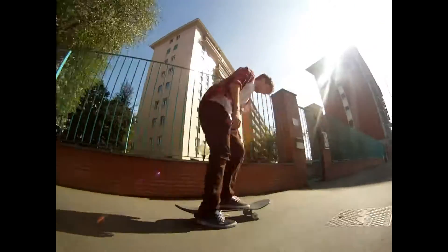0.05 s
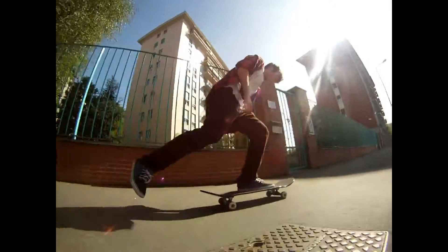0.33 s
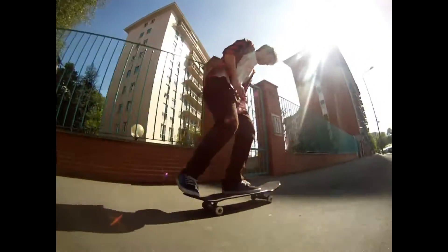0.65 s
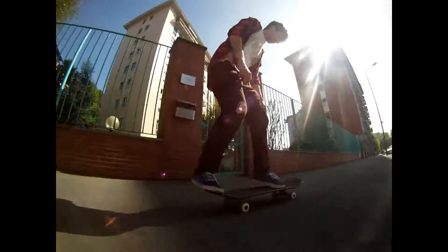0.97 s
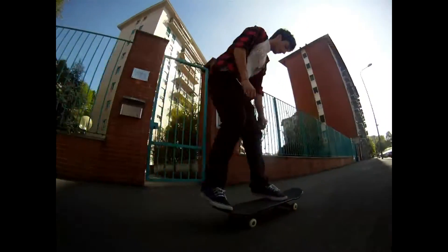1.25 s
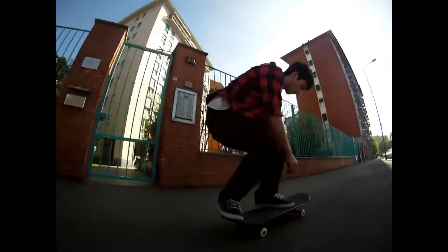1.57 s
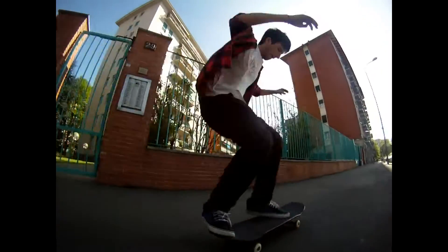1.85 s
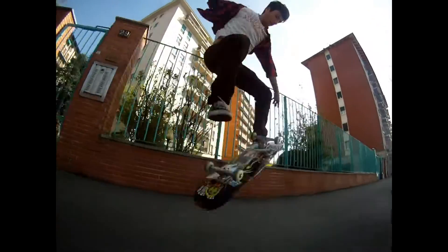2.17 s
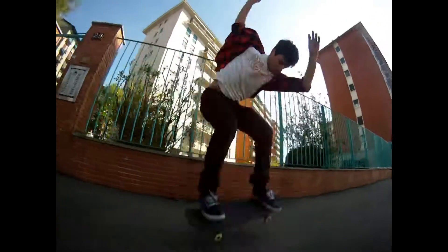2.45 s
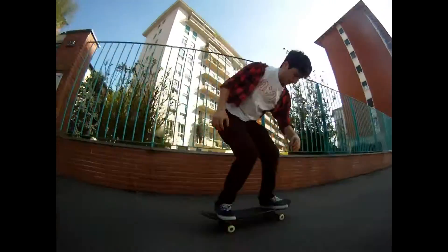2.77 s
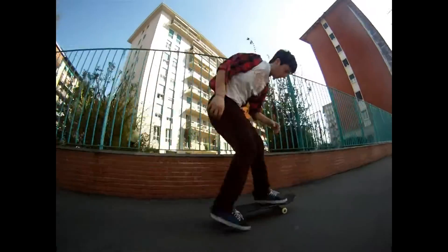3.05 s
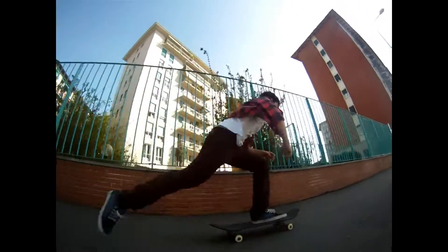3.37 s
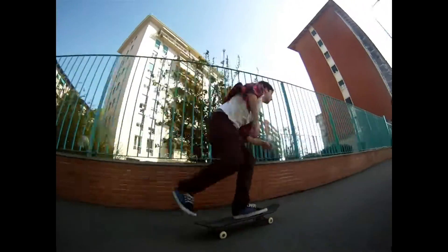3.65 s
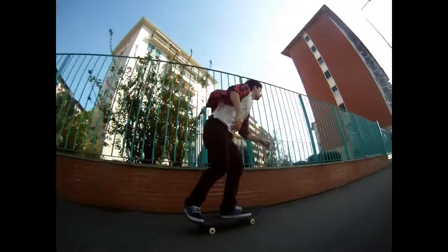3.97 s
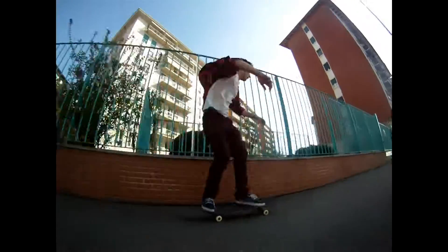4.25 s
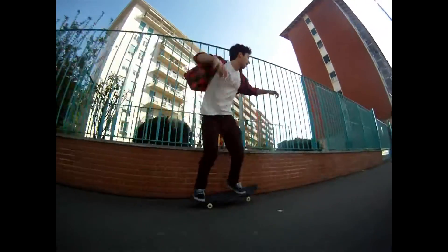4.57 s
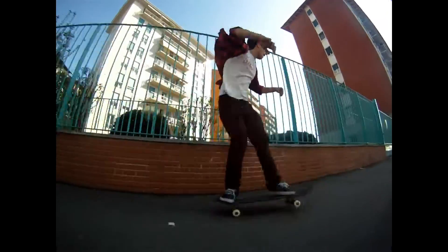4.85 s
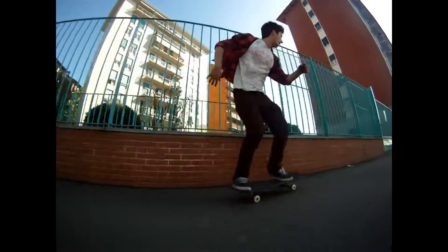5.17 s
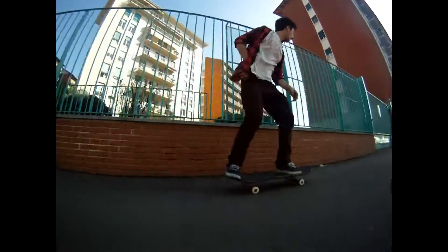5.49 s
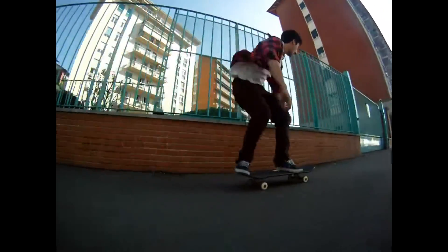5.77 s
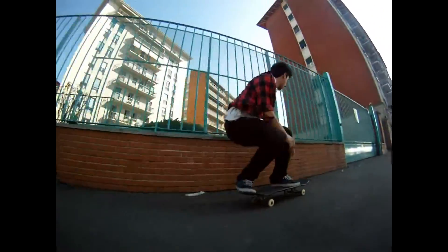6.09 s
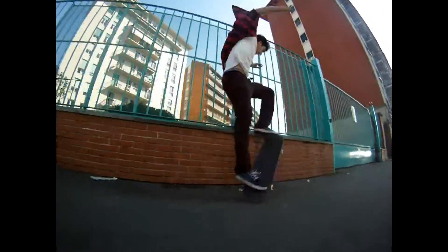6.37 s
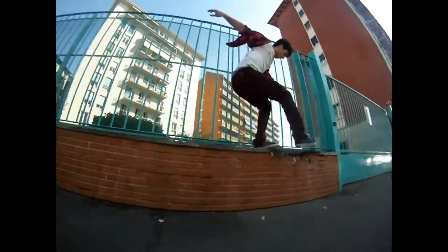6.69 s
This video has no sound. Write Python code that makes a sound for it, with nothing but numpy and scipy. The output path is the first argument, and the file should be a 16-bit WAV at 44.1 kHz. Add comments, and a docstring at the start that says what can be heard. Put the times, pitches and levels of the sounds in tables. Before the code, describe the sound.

A hard knock and a low shudder open on the gritty roar and hiss of skateboard wheels on asphalt. Shoes scuff between small clicks, then the board pops sharply and lands with a loud, slightly overloaded clatter. Rolling continues with more scuffs and a growing rumble, ending in clacks and scrapes on a ledge. The microphone rides along close by, and the street returns a faint, short echo.

```python
"""A knock and a low shudder open on the roar and hiss of skateboard wheels rolling over asphalt.
The skater pops a flip trick, lands hard, pushes on and jumps onto a ledge: shoes and wheels scuff,
deck and trucks clack, and house fronts echo the clacks. A small camera in a plastic case rides along.
It shudders with the ground, faster as the speed grows; the resonances of its case colour the rolling,
scuffs and clacks, and the hardest blows overload its microphone."""
import sys
import numpy as np
from scipy import signal
from scipy.fft import rfft, irfft
from scipy.io import wavfile

SR = 44100
rng = np.random.default_rng(int(sys.argv[2]) if len(sys.argv) > 2 else 0)


def store_pcm(level_fs):
    """Save levels as 16-bit WAV."""
    pcm = np.round(np.clip(level_fs, -1, 1) * 32767).astype(np.int16)
    wavfile.write(sys.argv[1], SR, np.atleast_2d(pcm).T)


N = 301203

# speed of the ride, as the rate at which it shakes the camera: t/s, f/Hz
SHAKE_RATE = [(0, 56.15), (.17, 53.04), (.3, 32.68), (.85, 38.14), (1.2, 33.86), (1.8, 42.15),
              (2.15, 37.02), (2.75, 44.87), (3.4, 57.35), (3.9, 62.86), (4.12, 56), (4.6, 64.8),
              (5.1, 62.1), (5.6, 68.45), (6.0, 62.8), (6.25, 55.1), (6.55, 65.8), (6.83, 65.3)]
# spectrum of a hard contact with the board: f/Hz, level/dB
IMPACT_SPECTRUM = [(60, -2), (200, -6.5), (400, -7), (700, -8.5), (1600, -5.5), (2600, -0.5), (4400, -18),
                   (7600, -27), (12000, -32), (15200, -22.5), (16000, -7.5)]


def amp(db):
    """Amplitude ratio of a level in decibels."""
    return 10 ** (np.asarray(db) / 20)


def unit_rms(x):
    """Normalisation to unit mean power."""
    return x / np.sqrt(np.mean(x ** 2) + 1e-20)


def at_frequency(points, hz):
    """Linear interpolation on a log-frequency axis."""
    f, value = np.transpose(points)
    return np.interp(np.log(hz + 1), np.log(f + 1), value)


def over_time(points):
    """Linear interpolation in time, sample by sample."""
    times, values = np.transpose(points)
    return np.interp(np.arange(N) / SR, times, values)


def add(mix, start, sound):
    """Superposition of a sound on the mix from a start time in seconds."""
    part = mix[max(round(start * SR), 0):][:len(sound)]
    part += sound[:len(part)]


def wander(hz):
    """Low-pass noise: a random fluctuation of unit power, up to about hz."""
    f = np.fft.rfftfreq(N, 1 / SR)
    return unit_rms(irfft(rfft(rng.standard_normal(N)) * np.exp(-(f / hz) ** 2), N))


def noise(spectrum):
    """Stationary noise of unit power with the given spectrum."""
    gain = amp(at_frequency(spectrum, np.fft.rfftfreq(N, 1 / SR)))
    return unit_rms(irfft(rfft(rng.standard_normal(N)) * gain, N))


def colour(x, gain_db, size=4096):
    """Minimum-phase filtering by gain_db(hz): resonances ring on after each click."""
    log_gain = np.log(amp(gain_db(abs(np.fft.fftfreq(size, 1 / SR)))))
    response = np.exp(np.conj(signal.hilbert(log_gain)))
    taps = np.fft.ifft(response).real
    return signal.fftconvolve(x, taps[:size // 2])[:len(x)]


def resonate(x, hz, width_hz):
    """A moving resonance by heterodyning: shift the curve hz down to zero, smooth, shift back."""
    phasor = np.exp(2j * np.pi * np.cumsum(hz) / SR)
    pole = np.exp(-np.pi * width_hz / SR)
    return 2 * (phasor * signal.lfilter([1 - pole], [1, -pole], x / phasor)).real


def ring(modes, t):
    """Free vibration after a blow: a sum of exponentially damped modes."""
    return sum(amp(db - 60 * t / t60) * np.sin(2 * np.pi * hz * t) for hz, db, t60 in modes)


def grit(per_s, spread_db):
    """Shot noise: stones of uneven size are struck at random times."""
    strikes = (rng.random(N) < per_s / SR) * rng.standard_normal(N)
    sizes = amp(spread_db * np.minimum(rng.exponential(1, N), 4))
    return unit_rms(strikes * sizes)


def speed_gain_db(per_doubling_db, cruise_hz=60):
    """A power law of speed: 0 dB when cruising, and an equal step for each doubling."""
    return per_doubling_db * np.log2(over_time(SHAKE_RATE) / cruise_hz)


def case_db(hz):
    """Resonances of the camera case, with one narrow notch; apart from these, the top treble is cut."""
    # case resonances and notch, then the treble cut in the last row: f/Hz, half width/Hz, gain/dB
    bands = [(544, 44, 2.5), (838, 82, 4.5), (998, 112, 7), (1420, 197, 5), (2029, 73, 8),
             (2283, 173, 11.5), (2960, 240, 5), (3172, 118, 8.5), (3475, 66, 7), (3833, 320, 8),
             (5140, 350, 12.5), (5700, 110, 7), (6130, 120, 4.5), (6860, 490, 14.5), (8150, 380, 15.5),
             (8904, 440, 13.5), (9734, 716, 21.5), (10830, 280, 15), (8730, 72, 10), (9760, 33, 11.5),
             (14200, 940, 16.5), (14260, 70, -14), (17700, 530, -28)]
    return sum(db * np.exp(-((hz - f) / width) ** 2) for f, width, db in bands)


def street_echo(x, delay_s=0.026, reflections_per_s=2000):
    """Scattering: walls and house fronts return a short, diffuse echo."""
    # reverberation time of the street: f/Hz, T60/s
    decay_times = [(100, 0.22), (1000, 0.37), (2500, 0.14), (8000, 0.22), (16000, 0.12)]
    reflections = rng.standard_normal(SR) * (rng.random(SR) < reflections_per_s / SR)
    reflections *= np.arange(SR) / SR > delay_s
    hz, t, spectra = signal.stft(reflections, SR, nperseg=256)
    decay = amp(-60 * t / at_frequency(decay_times, hz)[:, None])
    tail = signal.istft(spectra * decay, SR)[1]
    return signal.fftconvolve(x, tail / np.linalg.norm(tail))[:N]


def whine(rumble, hz=12000, gain_db=-42):
    """Amplitude modulation: a thin high whine flutters with every swing of the rumble."""
    carrier = np.sin(2 * np.pi * hz * np.arange(N) / SR)
    return amp(gain_db) * rumble * carrier


def shudder(cruise_db=-22.5, drift=0.039, throb=0.67, surge_taper=0.45, sway_db=-27, thrum_db=-27):
    """Forced vibration: the ground shakes the camera, faster and harder with speed, and jolts rock it."""
    # surges of hard, even shaking: start t/s, end t/s, level/dB
    surges = [(1.087, 1.312, -34), (2.121, 2.355, -26), (2.881, 3.583, -24), (3.763, 4.0, -14.5),
              (4.53, 5.06, -14), (5.14, 5.497, -18.5), (5.607, 5.706, -14.5), (5.746, 5.96, -13.5),
              (6.27, 6.44, -18), (6.485, 6.63, -16)]
    # spectrum of the slow, loose sway: f/Hz, level/dB
    sway_spectrum = [(8, -1), (20, -20), (31, 11), (40, 3.5), (60, -5), (78, -26.5), (200, -49)]
    # spectrum of the thrum that grows with speed: f/Hz, level/dB
    thrum_spectrum = [(40, -9), (58, -20.5), (70, 4.5), (82, 2), (100, -15.5), (130, -15.5), (200, -22),
                      (400, -29), (1500, -66)]
    # jolts: t/s, level/dB, f/Hz, rise time/s
    jolts = [(0.046, -4, 54.6, 0.013), (0.094, -13, 57, 0.027), (6.212, -0.5, 52, 0.012)]
    cycles = np.cumsum(over_time(SHAKE_RATE) * (1 + drift * wander(hz=26.8))) / SR
    swing = amp(cruise_db + speed_gain_db(per_doubling_db=12)) * (1 + throb * wander(hz=26))
    for start, end, db in surges:
        add(swing, start, amp(db) * signal.windows.tukey(int((end - start) * SR), surge_taper))
    out = unit_rms(np.sin(2 * np.pi * cycles)) * swing
    out += amp(sway_db) * noise(sway_spectrum)
    out += amp(thrum_db + speed_gain_db(per_doubling_db=27)) * noise(thrum_spectrum)
    t = np.arange(SR // 4) / SR
    for start, db, hz, rise in jolts:
        envelope = (t / rise) ** 2 * np.exp(2 * (1 - t / rise))
        add(out, start, -amp(db) * envelope * np.sin(2 * np.pi * hz * t))
    return out


def knocks(puff_band_hz=(160, 340), puff_t60=0.034):
    """Structure-borne sound: blows ring the deck and the camera mount, with a dull puff from the case."""
    # blows through the mount: t/s, deck level/dB, mount level/dB, puff level/dB
    blows = [(0.0401, -46, -50, -19.5), (0.0477, -0.5, -1, -18), (0.097, -43, -33, -27),
             (1.734, -27, -41, -38), (2.5, -17, -35, -32), (6.2094, -25, -14, -16.5),
             (6.431, -47, -36, -33)]
    # modes of the deck under the camera: f/Hz, level/dB, T60/s
    deck_modes = [(190, -34, .07), (467, -14, 0.048), (593, -3, 0.049), (619, -9.5, 0.13),
                  (848, -2.5, 0.048), (1440, -2.5, 0.048), (1893, -9, 0.071), (2400, -2, 0.027),
                  (3080, -11.5, 0.023)]
    # modes of the mount: f/Hz, level/dB, T60/s
    mount_modes = [(966, 4, 0.016), (1153, 0, 0.027), (2011, 4.5, 0.03), (2145, -14.5, 0.023),
                   (9910, -9, 0.041), (10300, -48, .035), (9120, -46, 0.036), (11400, -17, 0.03)]
    out, t = np.zeros(N), np.arange(SR // 4) / SR
    band = signal.butter(3, puff_band_hz, "band", fs=SR, output="sos")
    for start, deck_db, mount_db, puff_db in blows:
        puff = signal.sosfilt(band, rng.standard_normal(len(t)) * amp(-60 * t / puff_t60))
        puff /= np.std(puff[:SR // 50])
        ringing = amp(deck_db) * ring(deck_modes, t) - amp(mount_db) * ring(mount_modes, t)
        add(out, start, ringing + amp(puff_db) * puff)
    return out


def wheels(roar_db=-34.5, hiss_gain_db=7.5, stones=0.82, roar_share=0.27):
    """Rolling noise: road roughness excites a roar and a hiss that flutter with the contact pressure."""
    # spectrum of the low roar: f/Hz, level/dB
    roar_spectrum = [(40, 2.5), (110, -3), (200, -3.5), (400, -7.5), (700, -9.5), (1400, -15), (2200, -28),
                     (4400, -33), (15000, -72)]
    # spectrum of the gritty hiss: f/Hz, level/dB
    hiss_spectrum = [(300, -52), (1200, -17), (1900, -8), (2600, -10.5), (4400, -21.5), (7600, -31),
                     (12000, -46), (15200, -30), (15450, -67)]
    # course of the hiss, which the roar partly follows: t/s, relative level/dB
    hiss_course = [(0, -43.5), (.2, -40.5), (.35, -50), (.53, -50.5), (.76, -42.5), (1.02, -51),
                   (1.35, -45.5), (1.95, -44.5), (2.3, -50), (2.6, -44), (3.3, -43.5), (3.62, -46.5),
                   (4.08, -38.5), (4.3, -43), (4.85, -41.5), (5.3, -44), (6.15, -45.5), (6.6, -40.5)]
    hiss_level = over_time(hiss_course)
    roar_level = roar_db + speed_gain_db(per_doubling_db=1.67)
    roar_level += roar_share * (hiss_level - hiss_level.mean())
    flutter_db, swell_db = wander(hz=33.3), wander(hz=9.1)
    texture = rng.standard_normal(N) + stones * grit(per_s=900, spread_db=1.5)
    roar = unit_rms(colour(texture, lambda hz: at_frequency(roar_spectrum, hz) + case_db(hz)))
    texture = rng.standard_normal(N) + stones * grit(per_s=1100, spread_db=2.0)
    hiss = unit_rms(colour(texture, lambda hz: at_frequency(hiss_spectrum, hz) + case_db(hz)))
    roar *= amp(roar_level + flutter_db + 0.05 * wander(hz=2))
    hiss *= amp(hiss_level + hiss_gain_db + 1.1 * flutter_db + swell_db)
    return roar + hiss


def pebbles(per_s=16, level_db=-35, spread_db=4.5, t60=0.056):
    """A Poisson process of small impacts: now and then a wheel ticks over a loose pebble."""
    t = np.arange(SR // 8) / SR
    strikes = (rng.random(N) < per_s / SR) * amp(spread_db * np.clip(rng.standard_normal(N), -2, 1))
    envelope = signal.fftconvolve(strikes, amp(-60 * t / t60))[:N]
    tick_noise = colour(rng.standard_normal(N), lambda hz: at_frequency(IMPACT_SPECTRUM, hz) + case_db(hz))
    return amp(level_db) * envelope * unit_rms(tick_noise)


def scuffs(width_hz=750, stones=0.77, chatter_db=2, fizz_db=-14):
    """Sliding friction: rubber dragged over grit gives a gliding, chattering swish and a sandy fizz."""
    # slides of shoes and wheels: start t/s, end t/s, level/dB, first f/Hz, last f/Hz
    slides = [(0.07, 0.213, -28, 2280, 2000), (.83, 0.973, -38, 2700, 3050),
              (1.845, 1.985, -38.5, 3100, 2780), (2.602, 2.76, -37.5, 3130, 3150),
              (2.7, 2.792, -30.5, 2300, 2196), (2.841, 3.249, -34, 3260, 2330),
              (3.235, 3.42, -31, 2400, 2213), (4.149, 4.331, -38, 1397, 1500),
              (4.355, 4.46, -27, 2575, 2940), (5.57, 5.677, -28.5, 2597, 3000),
              (6.338, 6.433, -29.5, 2652, 2620), (6.571, 6.66, -30, 2788, 2643),
              (6.674, 6.764, -29.5, 2500, 2800)]
    out = np.zeros(N)
    texture = rng.standard_normal(N) + stones * grit(per_s=900, spread_db=3)
    friction = colour(texture * amp(chatter_db * wander(hz=70)), case_db)
    for start, end, db, first_hz, last_hz in slides:
        stroke = friction[int(start * SR):int(end * SR)]
        hz = np.linspace(first_hz, last_hz, len(stroke))
        swish = unit_rms(resonate(resonate(stroke, hz, width_hz), hz, width_hz))
        fizz = amp(fizz_db) * unit_rms(stroke)
        add(out, start, amp(db) * (swish + fizz) * signal.windows.tukey(len(stroke), 0.5))
    return out


def clacks(rise_s=0.00053, rattle_db=-26, rattle_t60=0.19, ring_db=10.5, ring_width=0.091, uneven=0.22):
    """Impact excitation: a burst of hard contacts favours one resonance; the trucks rattle and ring on."""
    # impacts of deck, trucks and wheels:
    # t/s, level/dB, woody body gain/dB, brightness gain/dB, strongest ring f/Hz, T60/s
    impacts = [ (.21, -21.5, -11, 3.5, 2020, 0.031), (0.51, -32.5, 12, 6, 2530, .03),
               (.8145, -27.5, -6, 1, 2180, .03), (.882, -27.5, 5, 5, 3136, 0.057),
               (1.244, -20.5, 9, -3, 1850, 0.05), (1.262, -21, -3, 2.5, 2356, 0.08),
               (1.3692, -24.5, 8, 2, 2260, .055), (1.58, -26.5, 1, 3, 2375, .035),
               (1.698, -28.5, 4, 5, 3570, 0.067), (1.9904, -5, -3.5, 3.5, 4830, .018),
               (1.9922, -8.5, -3, -4.5, 2600, 0.042), (2.4048, -25, -2, 3, 2640, 0.19),
               (2.4913, 0.5, -0.5, -1, 2520, 0.037), (2.5008, -2.5, 1.5, 1.5, 2830, 0.062),
               (2.511, -6, 3, -10, 490, 0.049), (2.5165, -4.5, -1, 1, 1500, 0.029),
               (2.552, -22, -5, 3, 2170, 0.13), (2.949, -23.5, 10, 4.5, 2242, 0.051),
               (3.455, -24.5, 6, 1.5, 1080, 0.093), (3.826, -25, 6, 0, 1402, 0.13),
               (4.0895, -26, 11, 3, 2357, .04), (4.398, -22.5, 7, 7, 2003, 0.18),
               (4.427, -20.5, -5, 5, 3100, 0.046), (4.68, -23.5, 3.5, 4.5, 3053, 0.14),
               (4.9493, -13, 0.5, 2, 2888, 0.037), (5.242, -18.5, 5, 4.5, 2863, 0.056),
               (5.253, -25, 11, -1, 2490, 0.033), (5.681, -26, -2, 3, 2987, 0.25),
               (6.354, -11, -2.5, 1, 2639, .046), (6.366, -21.5, 6, 3, 2300, 0.11),
               (6.4813, -10.5, 1, 0, 2780, 0.046), (6.487, -17.5, 1.5, 4, 2180, 0.059),
               (6.519, -21, 5, 4, 2400, .13)]
    # modes of the metal trucks: f/Hz, level/dB, T60/s
    truck_modes = [(2036, 5.5, 0.22), (2500, -12.5, 0.14), (2340, 5, 0.083), (2740, -1, 0.23),
                   (3340, -16, .14), (3650, 3, 0.1)]
    out, t = np.zeros(N), np.arange(SR // 4) / SR
    for start, db, body_db, bright_db, ring_hz, t60 in impacts:
        attack = 1 - np.exp(-t / rise_s)
        decay = amp(-60 * t / t60) + amp(rattle_db - 60 * t / rattle_t60)
        contacts = rng.standard_normal(len(t)) * np.exp(uneven * rng.standard_normal(len(t)))
        tilt = [(1300, body_db), (2100, 0), (3500, 0), (5500, bright_db)]

        def response_db(hz):
            board_db = at_frequency(IMPACT_SPECTRUM, hz) + at_frequency(tilt, hz)
            peak_db = ring_db * np.exp(-((hz / ring_hz - 1) / ring_width) ** 2)
            return board_db + peak_db + 0.95 * case_db(hz)

        clack = colour(contacts * attack * decay, response_db)
        clack /= np.std(clack[:SR // 100])
        # the trucks take a smaller share of the hardest blows
        metal = amp(-28.5) * np.tanh(amp(db + 12)) * ring(truck_modes, t)
        add(out, start, amp(db) * clack + metal)
    return out


def scene(echo_db=-22):
    """Superposition of the skater's rolling, scuffs and clacks with the camera's knocks and rumble."""
    hits, rumble = clacks(), shudder()
    skater = wheels() + pebbles() + scuffs() + hits + amp(echo_db) * street_echo(hits)
    return (skater + knocks() + rumble + whine(rumble))[None]


def record(dry, clip_level=0.98, cutoff_hz=15600):
    """Overload: the microphone clips on the hardest blows, and a low-pass filter limits the band."""
    clipped = np.clip(dry, -clip_level, clip_level)
    low_pass = signal.firwin(511, cutoff_hz, window=("kaiser", 9), fs=SR)
    return signal.oaconvolve(clipped, low_pass[None], "same")


dry = scene()
out = record(dry)
store_pcm(out)
```